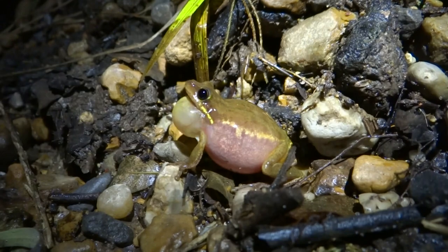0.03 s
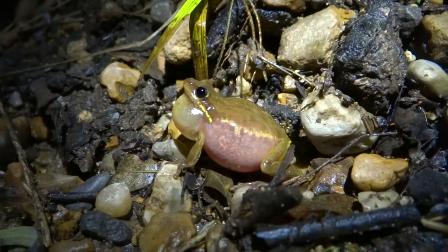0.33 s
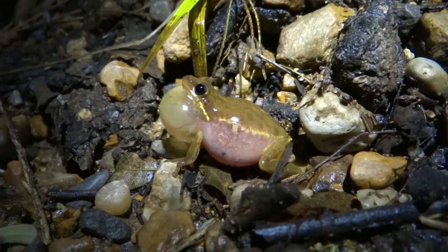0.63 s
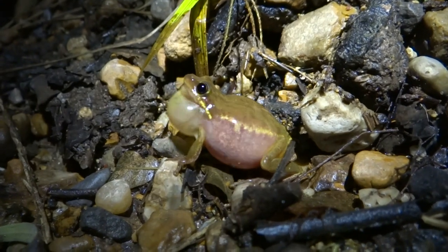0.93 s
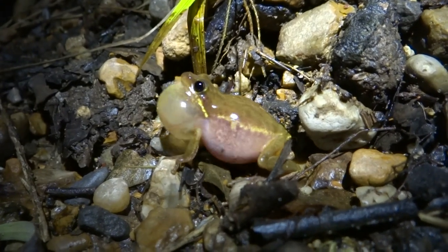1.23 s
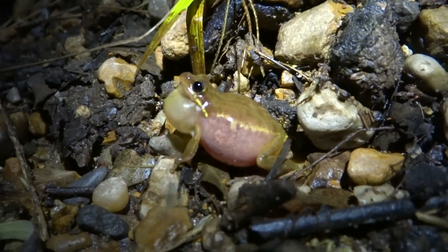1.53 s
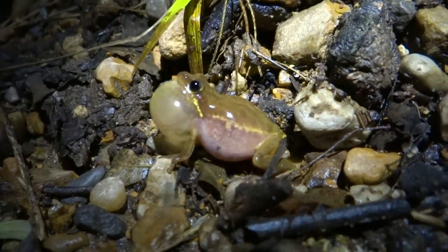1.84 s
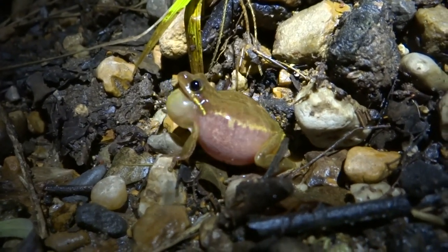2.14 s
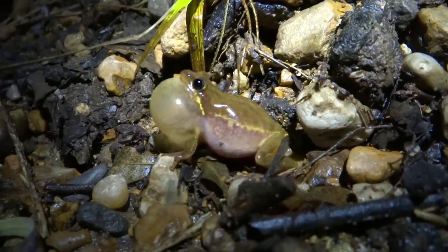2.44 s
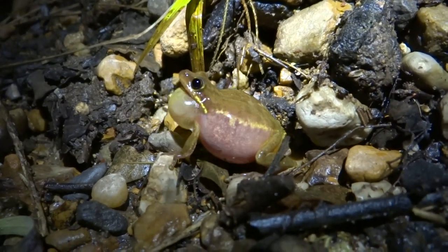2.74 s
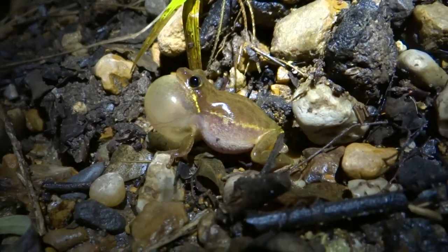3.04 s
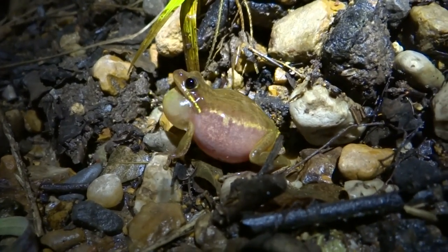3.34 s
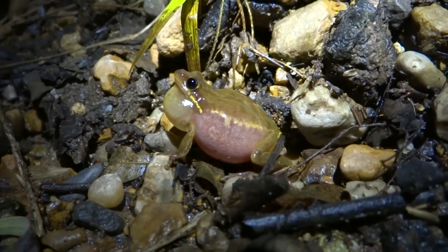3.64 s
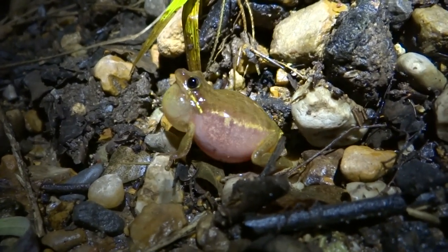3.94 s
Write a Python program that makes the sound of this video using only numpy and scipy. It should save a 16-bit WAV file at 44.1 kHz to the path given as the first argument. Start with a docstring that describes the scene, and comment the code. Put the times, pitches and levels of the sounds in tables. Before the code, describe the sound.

A treefrog croaks close by at about 0.6, 1.2, 1.8, 2.3 and 2.9 seconds, each a raspy, slightly rising quarter-second rattle with a crackly edge. It pauses, then starts again at 4 seconds. A quieter frog answers in the gaps. A distant pond chorus and faint shrill insects continue throughout. A toad trills softly at the start and near 3.8 seconds, and tiny wet ticks come around 0.5 seconds.

```python
"""Wet gravel near a pond at night: close to the microphone a treefrog croaks about twice a second.
Each croak is about 110 pulses a second: a low knock, then a short ring of the vocal sac that climbs as
the sac fills. Recorder distortion adds crackle and faint high tones to the pulses. Further off a
neighbour answers in the gaps; behind are the pond chorus, a trilling toad, insects, a few wet ticks
and a faint hum. A limiter holds the loudest peaks down."""
import sys
import numpy as np
from scipy import signal
from scipy.fft import rfft, irfft, next_fast_len
from scipy.io import wavfile
from scipy.ndimage import uniform_filter1d, minimum_filter1d

SR = 44100
rng = np.random.default_rng(int(sys.argv[2]) if len(sys.argv) > 2 else 0)


def dump_mix(stems):
    """Bounce the given channels to the path in sys.argv[1] as a 16-bit WAV at rate SR."""
    frames = np.atleast_2d(stems).T  # one column per channel
    limited = np.clip(frames, -1, 1)  # hard clip at full scale
    pcm = np.round(limited * 32767).astype(np.int16)
    wavfile.write(sys.argv[1], SR, pcm)


N = 176400
T = np.arange(N) / SR
MS = 1e-3
MARGIN_S = .02  # room either side of a pulse
PULSE_T = np.arange(-round(MARGIN_S * SR), round(MARGIN_S * SR)) / SR


# Croaks at the microphone (time [s], length [s], level [dB], head start of the sac's filling [s])
NEAR_CROAKS = [(.6130, .2349, 0, .014), (1.1931, .2451, 0, -.002), (1.7631, .2356, 0, .001),
               (2.3297, .2446, 0, .002), (2.9023, .2546, 0, .002), (3.9821, .2449, 1, .012)]
# Slack closing knocks (time [s], level [dB])
SLACK_KNOCKS = [(1.451, -2), (2.586, 2), (2.598, -11), (3.168, -2)]
# The close frog across the microphone pair (frequency [Hz], left minus right [dB])
NEAR_PAN = [(500, 2), (1400, -0.5), (2800, 2), (3400, 5.5), (5000, 3.5), (9000, 0)]
def near_frog():
    """The treefrog close to the microphone, almost dry; some croaks end in a slack knock or two."""
    x = np.zeros(N)
    for s, db in SLACK_KNOCKS:
        add(x, s - MARGIN_S, amp(db) * knock(PULSE_T))
    for s, length, db, head_s in NEAR_CROAKS:
        add(x, s - MARGIN_S, amp(db) * croak(length, head_s))
    return panned(x, NEAR_PAN) + amp(-39) * air(x)


def croak(length, head_s=0, pitch=1):
    """A train of pulses, each a blip, a knock and a ring of the filling sac; it begins MARGIN_S in."""
    x = np.zeros(int((length + 3 * MARGIN_S) * SR))
    times = pulse_times(length, per_s=110.3 * pitch)
    for s, (uneven, detune, damping) in zip(times, rng.standard_normal((len(times), 3))):
        t = PULSE_T + round(s * SR) / SR - s  # timed between samples
        fill_s = max(s + head_s, 0)
        strength = amp(.4 * uneven - 1.5 * np.exp((s - length) / .012))  # the last pulses weaken
        push = amp(6 * np.exp(-fill_s / .035) - 7.5 * np.exp(-fill_s / .008))  # soft start, early peak
        pulse = push * (blip(t, pitch) + knock(t, pitch)) + vocal_sac(t, fill_s, pitch, detune, damping)
        add(x, s, strength * pulse)
    return x


def pulse_times(length, per_s, settle_s=.06, tire_s=.012):
    """Pulses start slowly, settle, and drag at the end as the frog tires."""
    age = np.linspace(0, length, round(length * per_s) + 1)[1:]
    gaps = 1 + .085 * np.exp(-age / settle_s) + .15 * np.exp((age - length) / tire_s)
    times = np.append(0, np.cumsum(gaps)) * length / gaps.sum()
    return times + .045 * MS * rng.standard_normal(len(times))


# Spectrum of the knock at pitch 1 (frequency [Hz], level [dB])
KNOCK_TONE = [(300, -63), (700, -38.5), (950, -28.5), (1220, -8), (1500, -2.5), (1950, -14), (2200, -27),
              (2400, -33), (2650, -31.5), (2950, -20.5), (3600, -22), (4300, -41), (5000, -34), (5700, -41),
              (7600, -59), (9500, -45), (12000, -53), (15500, -56)]
# Sweep of the knock (frequency [Hz], early arrival [ms])
KNOCK_SWEEP = [(900, 1.0), (1250, .65), (1600, .3), (2100, .05), (3000, -.1), (5000, -.4)]
def knock(t, pitch=1):
    """A low knock that sweeps upward: its lows arrive first."""
    tone = [(hz * pitch, db) for hz, db in KNOCK_TONE]
    return amp(24.5) * colour(np.sinc(t * SR), tone, lead=KNOCK_SWEEP)


def blip(t, pitch, lead_ms=1.8, width_ms=.45):
    """A tiny tone opens the pulse just ahead of the knock."""
    age = t + lead_ms * MS
    return amp(-16) * np.exp(-(age / (width_ms * MS)) ** 2) * np.cos(2 * np.pi * 1950 * pitch * age)


# Ring of the sac as it fills (time [s], level [dB], decay [ms])
SAC_RING = [(0, -21, 1.2), (0.019, -5, 2.14), (.08, -8.5, 2.6), (.125, -5, 2.8), (.18, -4.5, 1.9),
            (.25, -7, 1.7)]
# Its climbing note at pitch 1 (time [s], frequency [Hz])
SAC_NOTE = [(.02, 2810), (.08, 3020), (.13, 3310), (.18, 3375), (.24, 3420)]
# Its timbre (frequency [Hz], level [dB])
SAC_TONE = [(1500, -13), (2300, -4), (2800, -1), (3450, -1.5), (3800, -10.5), (4400, -29), (6000, -2)]
def vocal_sac(t, fill_s, pitch, detune, damping):
    """The sac rings briefly, higher as it fills; the sound of recorder distortion is laid on top."""
    times, levels, decays = np.transpose(SAC_RING)
    level = amp(np.interp(fill_s, times, levels))
    decay_s = np.interp(fill_s, times, decays) * MS * np.exp(.027 * damping)
    hz = np.interp(fill_s, *np.transpose(SAC_NOTE)) * pitch + 8 * detune
    age = np.maximum(t + .15 * MS, 0)
    onset = 1 - np.exp(-(age / (.25 * MS)) ** 2)
    envelope = onset * np.exp(-age / decay_s)
    snap = 1 + 1.1 * np.exp(-age / (.45 * MS))
    ring = colour(snap * envelope * np.sin(2 * np.pi * hz * age), SAC_TONE)
    distortion = level * overload_crackle(t, age, onset, fill_s) + envelope * alias_tones(age, fill_s)
    return level * ring + distortion


# Spectrum of the recorder's overload crackle (frequency [Hz], level [dB])
CRACKLE_TONE = [(3000, -36), (4400, -1.5), (4800, 3), (5350, 0.5), (5700, -8.5), (6400, -4), (7600, -27),
                (9000, -6), (10300, -3), (12000, -17), (15500, -33)]
def overload_crackle(t, age, onset, fill_s, decay_ms=1.38, growth_db_per_s=41.5):
    """Bright, gritty recorder overload on a pulse, made of a click and a burst of noise."""
    burst = onset * np.exp(-age / (decay_ms * MS)) * rng.standard_normal(len(age))
    click = amp(12.5) * np.sinc(t * SR)
    return amp(-25 + growth_db_per_s * fill_s) * colour(burst + click, CRACKLE_TONE)


# Recorder aliasing in a croak (peak time [s], spread [s], frequency [Hz], glide [Hz/s], level [dB])
ALIAS_TONES = [(.195, .055, 13650, -15000, -33), (.075, .025, 12550, -16000, -35),
               (.195, .035, 11100, -6000, -36)]
def alias_tones(age, fill_s):
    """Faint high tones of aliased recorder distortion, falling from pulse to pulse."""
    x = np.zeros(len(age))
    for peak_s, spread_s, hz, glide, db in ALIAS_TONES:
        late_s = fill_s - peak_s
        level = amp(db) * np.exp(-(late_s / spread_s) ** 2)
        x += level * np.sin(2 * np.pi * (hz + glide * late_s) * age)
    return x


# The neighbour's croaks (time [s], length [s], level [dB])
ANSWERS = [(0.287, .25, -16), (0.832, 0.23, -18), (1.392, 0.27, -15.5), (2.001, 0.26, -13.5),
           (2.581, 0.22, -12), (3.097, 0.26, -14), (3.638, 0.22, -14)]
# Their colour at the microphone (frequency [Hz], level [dB])
ANSWER_TONE = [(1000, 3), (1600, -5.5), (3200, 0), (5000, 2.5), (12000, -9)]
def neighbour(wet_db=-3.5):
    """A second frog, further from the microphone, calls in the gaps."""
    x = np.zeros(N)
    for s, length, db in ANSWERS:
        add(x, s - MARGIN_S, amp(db) * croak(length))
    x = colour(x, ANSWER_TONE)
    return (x + amp(wet_db) * air(x)) / np.hypot(1, amp(wet_db))


# The pond chorus from a distance (frequency [Hz], level [dB])
CHORUS_TONE = [(600, -3), (1400, 2), (2200, -17), (3000, 4), (3600, 0), (5000, 5), (12000, 2)]
def chorus(count=14):
    """Many frogs of different sizes out at the pond, each repeating its croak at its own pace."""
    x = np.zeros(N)
    for k, (smallness, pace) in enumerate(rng.uniform(-1, 1, (count, 2))):
        call = croak(.25, pitch=1 + .067 * smallness)
        every_s = .55 * (1 + .06 * pace)
        for s in (np.arange(-1, 9) + k / count) * every_s:
            add(x, s + .015 * rng.standard_normal(), call * amp(2 * rng.standard_normal()))
    x = colour(x, CHORUS_TONE)
    return amp(-35) * unit(amp(-4) * x + air(x))


# The toad's trills (start [s], end [s], rate [notes/s], level [dB])
TRILLS = [(0.168, .64, 36, -24), (3.798, 4.08, 35, -20)]
def toad(note_s=.015, centre_hz=1427, fade_s=.069):
    """A toad a little right of the microphone trills in short, slightly falling notes."""
    x = np.zeros(N)
    progress = np.arange(0, 1, 1 / (note_s * SR))
    for start, end, rate, db in TRILLS:
        for s in np.arange(start, end, 1 / rate):
            hz = centre_hz * (1 - .12 * (progress - .5) + .021 * rng.standard_normal())
            note = np.sin(np.pi * progress) * np.sin(2 * np.pi * np.cumsum(hz) / SR)
            fade = min((s - start) / fade_s, (end - s) / fade_s, 1)
            add(x, s, amp(db) * fade * note)
    return (x + amp(-9) * air(x)) * amp([[-1.5], [1.5]])


# Swells of insect buzz (peak time [s], half length [s], level [dB])
BUZZES = [(0.334, .13, -43.5), (1.09, 0.11, -42.5), (1.607, 0.18, -50), (2.235, 0.11, -43),
          (2.66, 0.12, -43.5), (3.41, 0.12, -44), (3.8, 0.12, -41.5)]
def insects(centre_hz=6106, width_hz=230, steady_db=-48.5):
    """A narrow, shrill buzz behind the frogs swells and fades."""
    hz = np.fft.rfftfreq(N, 1 / SR)
    band = np.exp(-.5 * ((hz - centre_hz) / width_hz) ** 2)
    buzz = irfft(paired(*rfft(rng.standard_normal((2, N))), hz) * band, N)
    swell_power = sum(amp(db) ** 2 * np.exp(-2 * ((T - s) / half) ** 2) for s, half, db in BUZZES)
    return unit(buzz) * np.sqrt(amp(steady_db) ** 2 + swell_power)


# Small wet ticks (time [s], level [dB])
TICKS = [(0.391, -21), (0.4548, -18), (0.5068, -18), (0.533, -24), (0.6027, -16)]
def ticks(hz=2300, decay_ms=.25):
    """A few tiny wet clicks, each a tone that dies at once."""
    x, t = np.zeros(N), T[:SR // 100]
    tick = amp(-6) * np.exp(-t / (decay_ms * MS)) * np.sin(2 * np.pi * hz * t)
    for s, db in TICKS:
        add(x, s, amp(db) * tick)
    return x


# Spectrum of the farthest frogs and insects (frequency [Hz], level [dB])
HAZE_TONE = [(300, -36), (450, -35), (700, -24), (950, -14.5), (1200, -3), (1450, 3.5), (1750, -2),
             (2200, -12), (2600, -7), (3000, -2.5), (3450, -1.5), (3900, -12.5), (4500, -22.5), (5500, -35),
             (6500, -30), (7400, -39.5), (8200, -31), (9300, -25.5), (11000, -30), (12500, -36),
             (14000, -36.5), (15700, -49)]
def far_haze():
    """The callers farthest from the microphone merge into a patchy, flickering haze."""
    hz, frames = np.fft.rfftfreq(256, 1 / SR), N // 64 + 5
    a, b, c, d, patches = rng.standard_normal((5, frames, len(hz)))
    patches = unit(uniform_filter1d(uniform_filter1d(patches, size=5, axis=0), size=5, axis=1))
    flicker = unit(uniform_filter1d(rng.standard_normal(frames), size=3))[:, None]
    ripple_db = (2 * patches + .07 * flicker) / (1 + (hz / 6000) ** 2)  # steadier in the treble
    spectra = paired(a + 1j * b, c + 1j * d, hz) * amp(ripple_db)
    x = signal.istft(spectra.transpose(0, 2, 1), nperseg=256, noverlap=192)[1][:, :N]
    return amp(-29.5) * unit(colour(x, HAZE_TONE))


# Spectrum of the low outdoor noise (frequency [Hz], level [dB])
RUMBLE_TONE = [(20, -10), (45, -2), (80, 0.5), (130, 6), (190, -1), (300, -3), (500, -21), (1000, -29)]
# Tones of the hum (frequency [Hz], level [dB])
HUM_TONES = [(118.4, -69), (145.3, -67)]
def rumble():
    """Low outdoor noise and a faint wavering hum lie under everything."""
    x = amp(-61.5) * unit(colour(rng.standard_normal(N), RUMBLE_TONE))
    for hz, db in HUM_TONES:
        drift = rng.standard_normal(30) + 1j * rng.standard_normal(30)  # in level and phase
        waver = np.interp(T, np.linspace(0, T[-1], 30), 1 + .5 * drift)
        x += amp(db) * unit((waver * np.exp(2j * np.pi * hz * T)).real)
    return x


# Reverberation of the open ground (frequency [Hz], time to fall 60 dB [s])
AIR_T60 = [(500, 0.45), (3000, 0.35), (12000, 0.26)]
def air(x):
    """Scatter from ground and plants reaches the microphone as a short diffuse tail."""
    hz, t, noise = signal.stft(rng.standard_normal((2, SR // 2)), SR, nperseg=256)
    decay = amp(-60 * t / read(AIR_T60, hz)[:, None])
    tail = signal.istft(paired(*noise, hz[:, None]) * decay, SR, nperseg=256)[1]
    return signal.fftconvolve(x[None], tail / np.linalg.norm(tail[0]), axes=1)[:, :N]


# Diffuse sound at the microphone pair (frequency [Hz], left-right correlation [0-1])
LIKENESS = [(130, 0.98), (640, 0.97), (1400, 0.81), (3100, 0.8), (7000, 0.88), (15000, 0.93)]
def paired(a, b, hz):
    """Two independent spectra become a partly alike left and right."""
    same = np.clip(read(LIKENESS, hz), -1, 1)
    return np.array([a, same * a + np.sqrt(1 - same ** 2) * b])


def amp(db):
    """Decibels to gain."""
    return 10 ** (np.asarray(db) / 20)


def unit(x):
    """Scales to rms 1."""
    return x / np.sqrt(np.mean(x ** 2) + 1e-20)


def read(points, hz):
    """Reads a table on a log-frequency axis."""
    f, value = np.transpose(points)
    return np.interp(np.log(hz + 1), np.log(f + 1), value)


def colour(x, points, share=1, lead=None):
    """Filters by a (Hz, dB) table; lead (Hz, ms) sends some frequencies ahead."""
    n = next_fast_len(x.shape[-1] + 512)
    hz = np.fft.rfftfreq(n, 1 / SR)
    turns = np.cumsum(read(lead, hz)) * MS * SR / n if lead else 0
    response = amp(share * read(points, hz)) * np.exp(2j * np.pi * turns)
    return irfft(rfft(x, n) * response, n)[..., :x.shape[-1]]


def panned(x, points):
    """Spreads over left and right by a (Hz, left minus right dB) table."""
    left, right = np.broadcast_to(x, (2, N))
    return np.array([colour(left, points, .5), colour(right, points, -.5)])


def add(mix, s, sound):
    """Mixes a sound in at a time."""
    i = int(round(s * SR))
    part = mix[max(i, 0):][:max(len(sound) + min(i, 0), 0)]
    part += sound[max(-i, 0):][:len(part)]


# Rise and fall of the chorus and haze (time [s], level [dB])
CHORUS_SWELL = [(0, 3), (.25, 2.5), (.55, 5), (.75, 0.5), (1.0, 5), (1.15, 2), (1.55, 3.5), (1.9, 2.5),
                (2.2, 2.5), (2.5, 2), (2.85, 1.5), (3.2, 2.5), (3.39, -1), (3.53, 1), (3.64, 4), (4, 3)]
# The distant callers across the microphone pair (frequency [Hz], left minus right [dB])
FAR_PAN = [(60, 0.0), (130, 0.0), (290, 1.5), (640, -1), (1410, -2), (3100, -1.0), (6820, 0.5),
           (15000, 0.0)]
def scene():
    """The close treefrog in front of the night chorus."""
    swell = amp(np.interp(T, *np.transpose(CHORUS_SWELL)))
    far = (chorus() + far_haze()) * swell + neighbour()
    return near_frog() + panned(far, FAR_PAN) + toad() + insects() + ticks() + rumble()


def record(dry, ceiling_db=-3.9, recover_db_per_s=36, edge_hz=15750):
    """A limiter holds the croaks down and ducks the chorus; then a quick fade-in and the band limit."""
    over_db = np.maximum(20 * np.log10(abs(dry).max(0) + 1e-9) - ceiling_db, 0)
    recovery_db = T * recover_db_per_s
    held_db = np.maximum.accumulate(over_db + recovery_db) - recovery_db
    duck_db = uniform_filter1d(minimum_filter1d(-held_db, size=60), size=60)
    fade_in = np.clip((T - .042) / .019, 0, 1)
    lowpass = signal.firwin(511, edge_hz, window=("kaiser", 9), fs=SR)
    return signal.oaconvolve(dry * amp(duck_db) * fade_in, lowpass[None], "same")


dry = scene()
out = record(dry)
dump_mix(out)
```